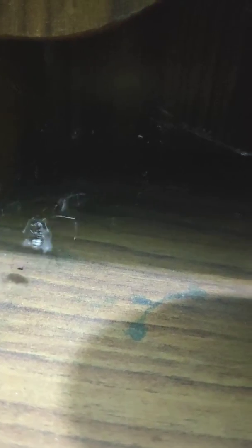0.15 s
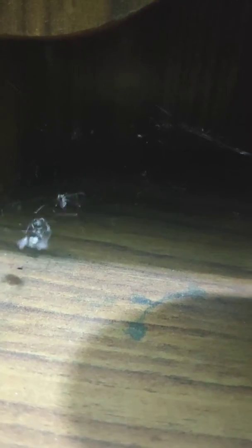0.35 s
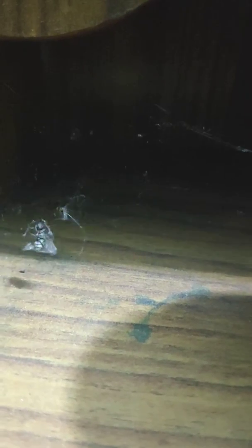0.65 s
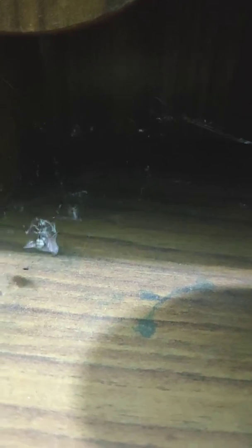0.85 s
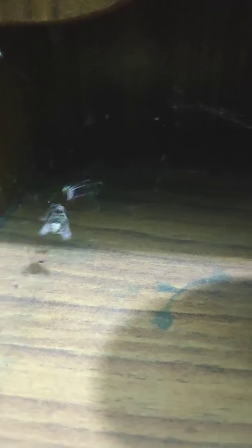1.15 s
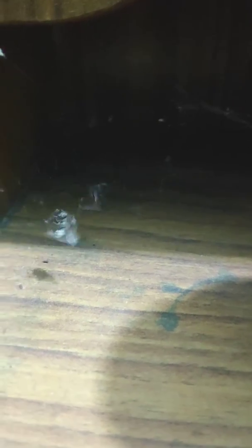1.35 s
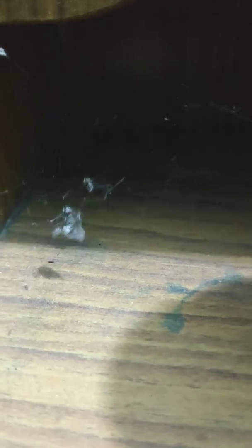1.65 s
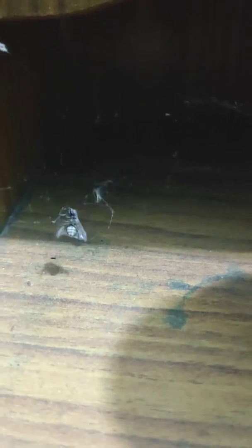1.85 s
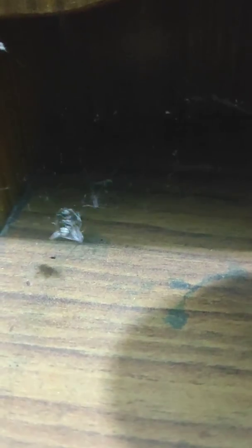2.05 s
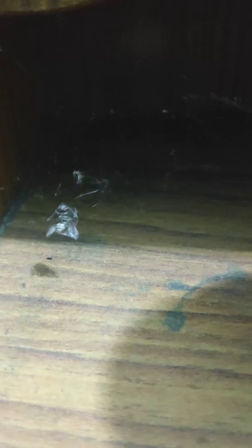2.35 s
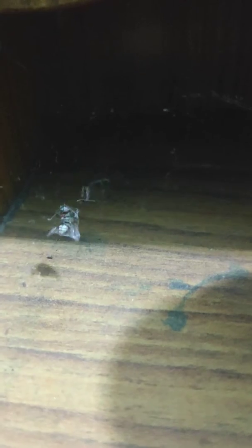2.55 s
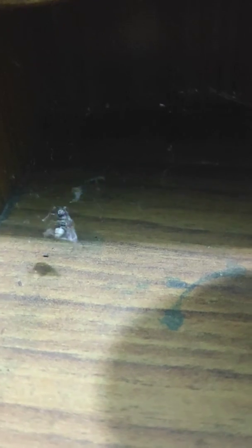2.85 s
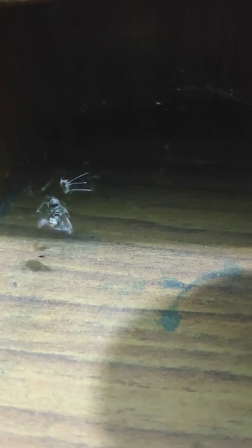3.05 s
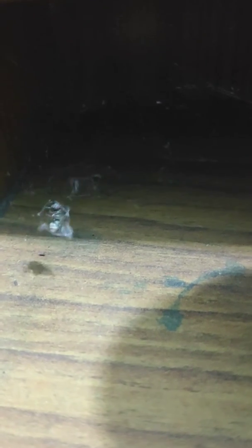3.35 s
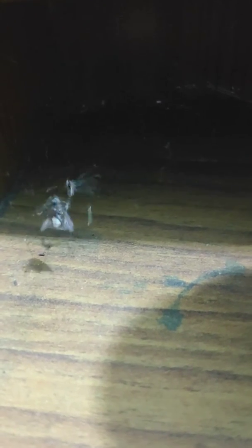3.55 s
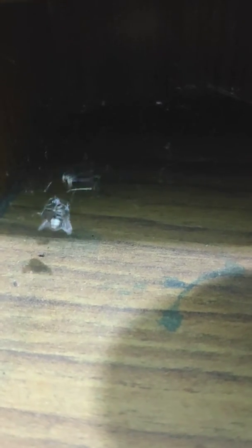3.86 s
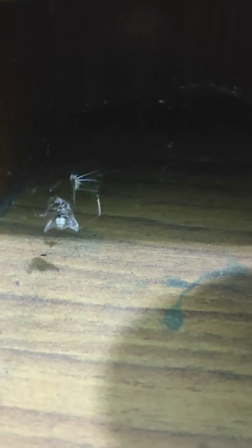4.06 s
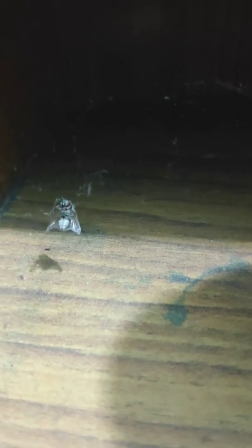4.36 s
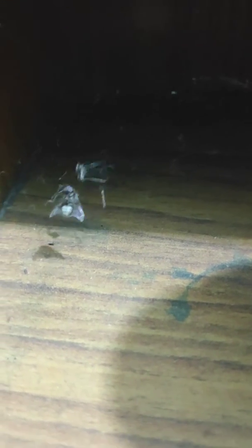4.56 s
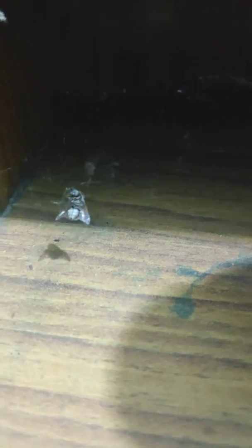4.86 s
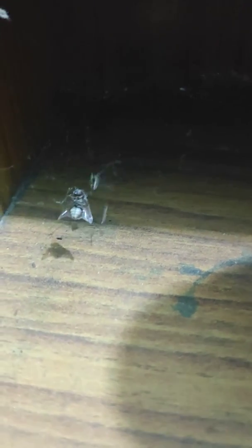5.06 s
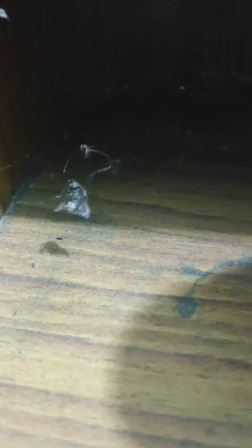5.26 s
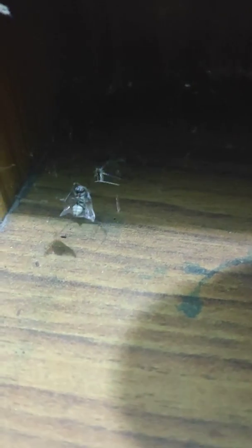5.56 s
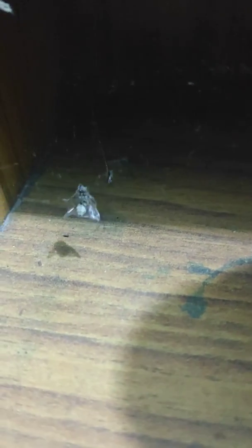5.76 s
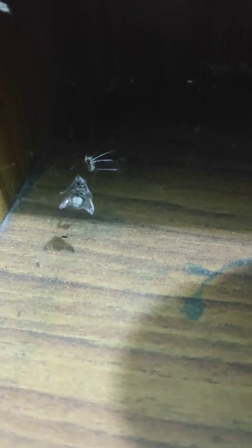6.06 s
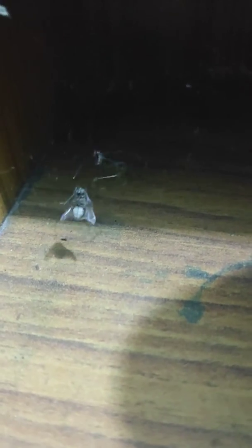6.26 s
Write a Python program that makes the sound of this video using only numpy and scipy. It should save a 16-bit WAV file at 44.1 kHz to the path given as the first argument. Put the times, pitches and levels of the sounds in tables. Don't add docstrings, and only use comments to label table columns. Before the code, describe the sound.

A trapped fly buzzes in raspy, rattling bursts on the right while heavy hand-on-microphone thumps and muffled rumbles bump on the left, cricket behind.

```python
import sys
import numpy as np
from scipy import signal
from scipy.io import wavfile
from scipy.ndimage import uniform_filter1d

SR = 44100
rng = np.random.default_rng(int(sys.argv[2]) if len(sys.argv) > 2 else 0)


def makeup_ratio(level_db):
    decades = np.asarray(level_db, float) / 20
    return 10 ** decades


def persist_wave(psi):
    counts = np.round(np.clip(psi, -1, 1) * 32767).astype(np.int16)
    wavfile.write(sys.argv[1], SR, np.atleast_2d(counts).T)


N = 282933
T = np.arange(N) / SR

# (frequency [Hz], density [dB per Hz])
ROOM = [(25, -83.5), (35, -70.5), (50, -95), (70, -90), (100, -96), (140, -105.5), (200, -99), (400, -101),
        (600, -106), (1000, -111), (1500, -113), (5000, -115), (8000, -115.5), (14000, -119)]
# (frequency [Hz], density [dB per Hz])
MUFFLED = [(25, -62), (70, -100), (140, -95.5), (300, -96.5), (600, -107), (1000, -110.5), (2500, -115),
           (5000, -117), (14000, -117.5)]
# (frequency [Hz], level [dB])
HUM = [
    (50, -65.5),
    (100, -66),
    (390, -85.5),
]
DRONE_S, DRONE_DB = 5.95, 8
# (time [s], level [dB])
WHINE = [(0, -86), (.2, -72.5), (.3, -110), (4.75, -110), (4.9, -78), (5.3, -76), (5.7, -83.5),
         (5.95, -105), (6.42, -110)]
# (frequency [Hz], width [Hz], level [dB])
WHINE_LINES = [(545, 10, 4), (1050, 41, -4), (1710, 8.1, -13), (1250, 30, -12), (249, 81, -5.5),
               (460, 28, -6)]
CHIRP_START, CHIRP_GAP = .08, .197

# (time [s], slow kneading level [dB])
GRIP = [(0, -53), (.21, -38.5), (.29, -48.5), (1.0, -50), (1.38, -42), (1.52, -53.5), (1.69, -45.5),
        (2.05, -48.5), (2.22, -38), (2.6, -43), (3.14, -53), (4.07, -57), (4.2, -40), (5.05, -42.5),
        (5.3, -43), (5.78, -48.5), (5.92, -60), (6.39, -59)]
# (time [s], quick creep level [dB])
SCUFFS = [(0.049, -36), (.6, -82), (.81, -55), (2.22, -64), (2.42, -62), (3.14, -53.5), (3.44, -50),
          (4.2, -55), (4.43, -46), (5.3, -61), (5.4, -53.5), (5.858, -53.5)]
CREEP_DB, SCUFF_S, SCUFF_KNEAD_DB = -30.5, 0.038, 5.5
# (time [s], pressure [dB], half rise [ms])
PRESSES = [(0.022, -12.5, 5.9), (0.1565, -20.5, 3.7), (0.785, -19, 0.73), (0.7904, -23.5, 1.57),
           (.055, -17, 3.4), (1.3146, -29.5, 1.64), (1.673, -20, 5.9), (1.8714, -25.5, 4.2),
           (2.3664, -27, 5.2), (2.3983, -26.5, 1.5), (2.411, -23, 3.45), (3.388, -19.5, 1.89),
           (3.401, -20.5, 3.96), (3.4224, -16, 1.77), (3.4697, -18.5, 2.3), (4.001, -32.5, 2),
           (4.1788, -15.5, 1.63), (4.261, -10, 1.8), (4.2975, -12, 1.54), (4.3158, -18, 2),
           (4.3757, -17, 3), (4.395, -13.5, 1.9), (4.4115, -20, 1.9), (4.4425, -16, 1.17),
           (4.502, -20, 2.5), (5.261, -38, 1.5), (5.352, -21.5, 4.2), (5.6116, -26.5, 1.27),
           (5.732, -28.5, 2.4), (5.8436, -5.5, 1.06), (5.854, -20, 1.8), (5.866, -33, 2),
           (5.8364, -26, 1.3), (5.432, -28, 2.3), (3.948, -32, 3.7), (3.695, -35, 3.06), (3.72, -44, 2.94),
           (2.327, -31.5, 2.6), (2.2, -35, 1.8), (2.219, -32, 1.46), (5.052, -27, 2.7), (5.205, -31.5, 3.3),
           (5.248, -38, 3.1), (5.291, -30, 2.2), (5.365, -22, 3.9), (5.409, -19, 3.1), (5.443, -18.5, 3.5),
           (6.0255, -29.5, 1.63)]
# (time [s], pressure [dB], half rise [ms])
LIFTS = [(0.0341, 0.5, 1.1), (0.052, -18, 2.8), (0.064, -24.5, 0.9), (5.341, -30, 2.5),
         (0.0733, -14.5, 1.9), (0.088, -13, 1.5), (0.1701, -16.5, 2.33), (0.2017, -17, 4.6),
         (0.7028, -26.5, 1.8), (0.8188, -17.5, 3), (1.3483, -17, 6), (2.1979, -40, 1.94),
         (2.2561, -26.5, 2.3), (2.322, -16.5, 6.6), (2.452, -30, 2.71), (3.0678, -27.5, 2.25),
         (3.134, -30.5, 2.84), (3.45, -17.5, 5.2), (3.786, -33, 1.46), (4.4259, -14, 2.64),
         (4.5453, -22, 2.74), (5.056, -27.5, 5.1), (3.731, -36.5, 2), (5.861, -30, 1.56), (5.818, -31, 2.8),
         (3.941, -37, 1.44)]
# (time [s], pressure [dB], width [ms])
SLIPS_ON = [(0.9194, -53, 0.95), (1.3437, -38, 0.67), (3.0646, -42.5, 0.77), (3.386, -34.5, 0.86),
            (3.4227, -35, 0.36), (4.194, -40.5, 0.68), (4.231, -33, 0.79), (4.3132, -30, 0.72),
            (4.41, -41, 0.68), (4.4324, -32.5, 0.68), (4.4419, -27.5, 0.88), (4.499, -39, 0.59),
            (4.65, -19.5, 0.9), (5.418, -11, 0.74), (5.608, -41, 0.7), (5.614, -43.5, 0.64),
            (5.7302, -40, 0.84), (5.81, -44, 0.63), (5.274, -55, 0.77), (5.909, -52, 0.67),
            (3.926, -48, 0.61), (6.0243, -33.5, 0.69)]
# (time [s], pressure [dB], width [ms])
SLIPS_OFF = [(0.0152, -14.5, 0.66), (.033, -9, 0.89), (0.0522, -28, 0.66), (0.0752, -27.5, 0.51),
             (0.169, -34.5, 0.99), (.212, -36.5, 0.64), (0.7836, -26, 0.49), (2.218, -72, 0.74),
             (2.396, -44, 0.62), (3.467, -36, 0.88), (3.9353, -39, 0.76), (4.2399, -18, 0.39),
             (4.2632, -28.5, 0.77), (4.2993, -30, 0.79), (4.3724, -35, 0.68), (4.397, -34, 0.78),
             (4.5411, -43, 0.65), (4.7974, -30.5, 0.82), (5.473, -32, 0.93), (5.845, -18.5, 0.96),
             (2.497, -53, 0.82), (5.879, -49, 0.52), (4.157, -50, 0.45), (0.7812, -38, 0.68),
             (0.738, -55, 0.45), (3.703, -59, 0.59)]
# (time [s], pressure [dB], half rise [ms], rebound [dB])
THUMPS = [
    (4.241, -2, 1.8, -11.5),
    (4.65, -5.5, 2, -7.5),
    (4.7952, -12.5, 2.47, -3),
    (5.4187, -9.5, 1.22, -13),
]
REBOUND_S, REBOUND_MS = 0.00957, 2.8
# (time [s], level [dB], frequency [Hz])
KNOCKS = [(.0158, -34, 750), (.034, -40, 790), (.0343, -37.5, 2050), (.0745, -49, 900), (.7838, -40, 740),
          (0.8195, -50, 970), (.088, -52, 900), (.053, -55, 1300), (.005, -43, 800), (1.312, -64, 801),
          (3.386, -49, 794), (3.421, -60, 902), (4.156, -63, 845), (4.178, -42.5, 1050), (4.238, -38, 700),
          (4.261, -53, 900), (4.313, -51, 900), (4.443, -69, 935), (4.649, -48, 960), (5.4184, -39.5, 800),
          (5.474, -60, 835), (4.541, -60, 695), (5.613, -56, 875), (5.8442, -24, 1087), (6.024, -47.5, 840),
          (2.219, -59, 993), (2.497, -68, 702), (5.413, -56, 880), (5.73, -61, 696)]
CRACK_RATIO, CRACK_DB = 1.64, -16.5
# (time [s], level [dB], clicks in a row [count])
TICKS = [
    (0.0343, -31, 7),
    (0.105, -46.5, 1),
    (0.152, -44, 1),
    (4.242, -44.5, 6),
    (5.844, -40, 1),
]

# (time [s], wing rate [beats per s], wing slap level [dB])
LUNGE = [(0.165, 250, -64), (0.2, 260, -64), (0.255, 230, -55.5), (0.29, 223, -54.5), (0.34, 172, -52),
         (0.355, 190.3, -56.5), (0.37, 207, -56.5), (0.405, 186, -57)]
JERK = [(0.425, 192.3, -63), (0.45, 189.7, -56), (0.485, 187.5, -58.5), (0.53, 157, -51),
        (0.545, 152.6, -49), (0.58, 163.9, -60), (0.63, 173.8, -61.5), (0.665, 195.7, -57.5)]
COAST = [(0.685, 194.7, -56.5), (0.715, 190.7, -62), (0.735, 198.3, -61.5), (0.795, 203, -65),
         (0.86, 193, -66.1), (0.925, 220.4, -67), (1.026, 225.9, -67), (1.061, 220.8, -66),
         (1.17, 235.7, -67)]
HAUL = [(1.215, 232.9, -64.5), (1.271, 214.5, -59.5), (1.305, 200.3, -64.5), (1.375, 180, -57),
        (1.404, 176.6, -58), (1.43, 158.7, -63), (1.449, 159.5, -58.5), (1.485, 147.2, -58)]
TUG = [(1.505, 154.2, -57.5), (1.525, 174.2, -61.5), (1.61, 198.9, -58), (1.64, 193.4, -55.5),
       (1.66, 181.2, -57.5), (1.685, 183.4, -56.5), (1.73, 165.8, -58.5), (1.744, 166, -56.5)]
WRENCH = [(1.765, 168.9, -57), (1.825, 174.1, -60.5), (1.85, 189.4, -58.5), (1.89, 184, -61),
          (1.945, 194.5, -59), (2.015, 176, -57), (2.06, 147.7, -60.5), (2.075, 152.2, -62)]
REST = [(2.098, 170.5, -67.5), (2.115, 174.1, -64), (2.145, 183.5, -67.5), (2.18, 195.1, -66),
        (2.215, 203.4, -63.5), (2.24, 195.1, -62.5), (2.34, 224.2, -68), (2.415, 222.5, -60.5)]
HANG = [(2.435, 219.7, -61), (2.505, 223.4, -68.5), (2.55, 212.8, -65), (2.665, 216, -68.5),
        (2.755, 192.1, -64.5), (2.775, 202.9, -65), (2.81, 196, -69), (2.82, 187.9, -65.5)]
THRASH = [(2.845, 191.5, -58.5), (2.865, 189.5, -60), (2.89, 167.6, -59), (2.925, 151.6, -57.5),
          (2.95, 156.7, -57.5), (2.984, 175.1, -58.5), (3.015, 178.4, -54), (3.065, 159.6, -56)]
GRIND = [(3.085, 165, -55), (3.1, 164.9, -54), (3.12, 169.4, -58), (3.17, 171.1, -56), (3.2, 157.6, -57.5),
         (3.24, 158.2, -59.5), (3.265, 150.5, -61), (3.295, 149.1, -61)]
KICK = [(3.315, 150.9, -57), (3.34, 152.1, -59), (3.375, 170.2, -60.5), (3.41, 176.3, -60.5),
        (3.44, 162, -60.5), (3.475, 156.8, -55.5), (3.495, 164.6, -62), (3.515, 189.4, -58)]
TIRE = [(3.535, 193.7, -57.5), (3.625, 183, -59.5), (3.7, 185.8, -64), (3.83, 212.7, -64.5),
        (3.86, 204.7, -63.5), (3.9, 209, -68.5), (3.92, 219.4, -77), (3.975, 212, -76)]
BOUTS = [LUNGE, JERK, COAST, HAUL, TUG, WRENCH, REST, HANG, THRASH, GRIND, KICK, TIRE]
# (high rattle [dB], wing tone [dB], body twist [dB per half octave], scrape [0-1])
POSTURE = [(-63, -65, -1.5, 1), (-63, -64.5, 4.5, 0.74), (-65.5, -64.5, 1.5, 1), (-66, -67, -4, 0),
           (-66, -64.5, 3, .3), (-66, -64, 0, 0.44), (-63.5, -66, 0, 0.99), (-69, -67.5, 3, 0.26),
           (-64.5, -66, 1, 0.01), (-66.5, -65.5, -3.5, 0), (-62, -63, -1, 0), (-68.5, -66, -4.5, 0.29)]
EASY_DB, RATTLE_FOLLOWS, TONE_FOLLOWS, SHIFT_S = -52.5, 0.33, 0.43, 0.21
# (third [dB], fifth [dB], sixth [dB], seventh [dB], buzz [dB])
STROKE = [(9, -1.5, 6, 3.5, -14), (0.5, -9, 0, 1.5, -9.5), (6, -4, 0.5, -3.5, -14), (-4, -8, 1, 2.5, -19.5),
          (-5, -2, 3, -1.5, -9.5), (-4.5, -5, 5, 2, -10.5), (3, 0, -4.5, -2, -31), (5, -3, -1, -5, -21),
          (-17, -4, -1, 2, -10), (-4, -11, 4, 0, -13.5), (-7, -4, 2, 1, -10.5), (5.5, -3.5, 2.5, -2.5, -18)]
SECOND_DB, UPPER_FALL_DB = -9.5, -3.5
# (time [s], length [s])
STUMBLES = [
    (2.088, 0.0093),
    (2.802, .016),
    (2.838, 0.0024),
    (2.852, 0.0085),
]
# (frequency [Hz], width [Hz], level [dB])
SLAP = [(6600, 700, -4), (7350, 700, 0), (8200, 850, 0), (9150, 900, -2.5), (10200, 1000, -11),
        (11300, 1300, -9), (14800, 4000, -21)]
# (frequency [Hz], width [Hz], level [dB])
RATTLE = [
    (2500, 520, -4.5),
    (3200, 600, -2),
    (4050, 800, -16),
    (5100, 440, 0),
    (5850, 800, -7),
]
# (time [s], level [dB], half length [s])
TOUCHES = [(0.48, -65, 0.21), (0.825, -70, 0.097), (1.342, -74, 0.21), (1.723, -71.5, 0.17),
           (2.029, -66, 0.061), (2.245, -68.5, 0.093), (2.426, -76.5, 0.076), (3.088, -73, 0.25),
           (3.719, -76, 0.18), (2.15, -83, 0.038), (2.351, -80, .06)]
LOOSE_DB = -79


def evened(x):
    return x / np.sqrt(np.mean(x ** 2) + 1e-20)


def read(points, hz):
    f, value = np.transpose(points)
    return np.interp(np.log(hz + 1), np.log(f + 1), value)


def curves(rows):
    s, *columns = np.transpose(rows)
    return [np.interp(T, s, c) for c in columns]


def drift(per_s):
    return np.interp(T * per_s, np.arange(3000), rng.standard_normal(3000)) * 1.2


def resonate(x, hz, width, order=1):
    turn = np.exp(2j * np.pi * np.cumsum(hz * np.ones(N)) / SR)
    r = np.exp(-np.pi * width / SR)
    low = x / turn
    for _ in range(order):
        low = signal.lfilter([1 - r], [1, -r], low)
    return 2 * (turn * low).real


def hiss(points, patchy_db):
    frames, hz = N // 512 + 5, np.fft.rfftfreq(2048, 1 / SR)
    a, b, patch = rng.standard_normal((frames, 1025, 3)).T
    patch = uniform_filter1d(patch, size=8, axis=0)
    patch = evened(uniform_filter1d(patch, size=4, axis=1))
    white = evened(signal.istft(a + 1j * b, nperseg=2048, noverlap=1536)[1])
    z = signal.stft(white, nperseg=2048, noverlap=1536)[2]
    z = z * makeup_ratio(read(points, hz)[:, None] + patchy_db * patch)
    return np.sqrt(SR / 2) * signal.istft(z, nperseg=2048, noverlap=1536)[1][:N]


def room_hum():
    out = 0
    for hz, db in HUM:
        swell_db = DRONE_DB * (hz > 300) * np.clip((T - DRONE_S) / 0.092, 0, 1)
        level = makeup_ratio(db + 3.3 * drift(6.5) + swell_db)
        out = out + level * np.sin(2 * np.pi * (hz * T + 0.55 * drift(8.6)))
    return out


def far_whine():
    out = 0
    for hz, width, db in WHINE_LINES:
        out = out + makeup_ratio(db) * evened(resonate(rng.standard_normal(N), hz, width))
    return makeup_ratio(curves(WHINE)[0]) * out


def cricket():
    phase = (T - CHIRP_START) / CHIRP_GAP % 1
    gate = np.clip(phase / .14, 0, 1) * np.clip((.66 - phase) / .42, 0, 1) * makeup_ratio(drift(42.))
    return makeup_ratio(-76.5) * gate * evened(resonate(rng.standard_normal(N), 5720, 420, order=2))


def add(mix, s, sound):
    part = mix[max(round(s * SR), 0):][:len(sound)]
    part += sound[:len(part)]


def push(ms):
    u = np.arange(3000) / (SR * ms / 1000)
    return (u / 2) ** 2 * np.exp(2 - u) * (1 - np.exp(-(u / .6) ** 2))


def flick(ms):
    u = np.arange(600) / (SR * ms / 1000) - 3
    return -u * np.exp((1 - u ** 2) / 2) * (1 - np.exp(-(2 * u + 6) ** 2))


def vented(x):
    turn = 2 * np.pi * 44.9
    return signal.lfilter(*signal.bilinear([1, 0, 0], [1, turn / 0.79, turn ** 2], SR), x)


def creep(per_s, sizes_ms):
    out = 0
    for ms in sizes_ms:
        train = rng.standard_normal(N) * (rng.random(N) < per_s / SR)
        soft = uniform_filter1d(np.roll(push(ms), 200), size=max(round(ms * SR / 1000), 1))
        out = out + signal.oaconvolve(train, soft)[:N] / np.sqrt(ms)
    return evened(vented(out))


def kneading():
    scuff = np.zeros(N)
    for s, db in SCUFFS:
        scuff = scuff + makeup_ratio(db) * np.exp(-((T - s) / SCUFF_S) ** 2)
    knead = makeup_ratio(curves(GRIP)[0])
    slow = (knead + makeup_ratio(SCUFF_KNEAD_DB) * scuff) * creep(180., (2.1, 3.2, 5.))
    quick = (makeup_ratio(CREEP_DB) * knead + scuff) * creep(250., (.6, 1.1))
    return slow + quick


def knock(hz):
    cycles = np.arange(400) * hz / SR
    envelope = (cycles / 0.34) * np.exp(1 - cycles / 0.5) * (1 - np.exp(-(cycles / 0.35) ** 2))
    return np.sin(2 * np.pi * cycles) * envelope


def port_pressure():
    air = np.zeros(N)
    gestures = ((push, 1, PRESSES), (push, -1, LIFTS), (flick, 1, SLIPS_ON), (flick, -1, SLIPS_OFF))
    for shape, direction, rows in gestures:
        for s, db, ms in rows:
            add(air, s, direction * makeup_ratio(db) * shape(ms))
    for s, db, ms, rebound_db in THUMPS:
        add(air, s, makeup_ratio(db) * push(ms))
        add(air, s + REBOUND_S, makeup_ratio(db + rebound_db) * push(REBOUND_MS))
    for s, db, hz in KNOCKS:
        crack = makeup_ratio(CRACK_DB + 0.43 * (db + 31)) * knock(CRACK_RATIO * hz)
        add(air, s, makeup_ratio(db + 0.5) * (knock(hz) + crack))
    air = signal.lfilter(*signal.butter(2, 2500., fs=SR), air)
    return vented(air)


def fast_ticks():
    ticks = np.zeros(N)
    for s, db, repeats in TICKS:
        for k in range(max(round(repeats), 1)):
            add(ticks, s + k / 6050., makeup_ratio(db) * np.array([.5, 1, .5]))
    return signal.sosfilt(signal.butter(2, 800., "high", fs=SR, output="sos"), ticks)


def by_bout(table):
    bout = np.maximum(np.searchsorted([rows[0][0] for rows in BOUTS], T) - 1, 0)
    return uniform_filter1d(np.array(table, float)[bout].T, size=round(SHIFT_S * SR), axis=1)


def effort():
    hz, slap_db = curves(sum(BOUTS, []))
    rattle_db, tone_db, twist_db, rough = by_bout(POSTURE)
    over_db = slap_db - EASY_DB
    dying_db = np.minimum(over_db + 12, 0)
    rattle_db = rattle_db + RATTLE_FOLLOWS * over_db + dying_db - slap_db
    tone_db = tone_db + TONE_FOLLOWS * over_db + dying_db / 2 - slap_db
    return hz, slap_db, rattle_db, tone_db, twist_db, rough


def body(x, modes, wander_db, tilt_db):
    out = 0
    for k, (hz, width, db) in enumerate(modes):
        lean_db = tilt_db * np.clip(4 * np.log2(hz / 8200.), -.6, .8) * (hz > 7000)
        ring = resonate(x, hz * (1 + .012 * drift(9.)), width, order=2)
        out = out + (-1) ** k * makeup_ratio(db + lean_db + wander_db * drift(12.)) * ring
    return out / np.sqrt(uniform_filter1d(out ** 2, size=3000) + 1e-12)


def wing_slap(clicks, puff, noise, rough, twist_db):
    drive = clicks + noise * (.14 * puff + .04 * np.clip(rough, 0, 1))
    drive = drive + .3 * np.roll(drive, round(.0011 * SR))
    return body(drive, SLAP, wander_db=2.6, tilt_db=twist_db / 2)


def high_rattle(knocks):
    rattle = body(knocks, RATTLE[3:], wander_db=2, tilt_db=0) * makeup_ratio(1.8 * drift(9.) + 1.5 * drift(30.))
    buzz_db = by_bout(STROKE)[4]
    return rattle - makeup_ratio(buzz_db + 1.5) * evened(resonate(knocks, 4050., 1300., order=2))


def low_rattle(knocks):
    coupling = makeup_ratio(LOOSE_DB)
    for s, db, half in TOUCHES:
        coupling = coupling + makeup_ratio(db) * np.exp(-((T - s) / half) ** 2)
    release = np.clip((TIRE[-2][0] - T) / .03, 0, 1)
    return body(knocks, RATTLE[:3], wander_db=2.2, tilt_db=0) * coupling * release


def wing_tone(turns, stroke_level, strain, noise):
    third_db, fifth_db, sixth_db, seventh_db, _ = by_bout(STROKE)
    partials_db = [SECOND_DB, third_db, 0, fifth_db, sixth_db]
    partials_db += [seventh_db + UPPER_FALL_DB * k for k in range(6)]
    tone = 0
    for partial, db in enumerate(partials_db, start=2):
        tone = tone + makeup_ratio(db + 2 * drift(11.)) * np.cos(2 * np.pi * (partial * turns + rng.random()))
    tone = evened(tone) * uniform_filter1d(stroke_level, size=60)
    tone = tone + .22 * strain * evened(resonate(noise, 1250., 500.))
    return tone / np.sqrt(uniform_filter1d(tone ** 2, size=4000))


def wings_free():
    alive = np.clip((T - LUNGE[0][0]) / 0.044, 0, 1) * np.clip((TIRE[-1][0] - T) / 0.017, 0, 1)
    for s, length in STUMBLES:
        outside = abs(T - s - length / 2) - length / 2
        alive = alive * np.clip(0.078 + outside / 0.0014, .08, 1)
    return alive


def fly():
    hz, slap_db, rattle_db, tone_db, twist_db, rough = effort()
    strain = np.clip((215 - hz) / 50, 0, 1)
    turns = np.cumsum(hz * (1 + (.003 + .013 * strain) * drift(70.))) / SR
    strength = makeup_ratio(1.6 * rng.standard_normal((2000, 2)))
    down = np.floor(turns).astype(int)
    up = np.floor(turns + 0.66 + 0.023 * drift(170.)).astype(int)
    downstrokes = np.diff(down, prepend=0) * strength[down, 0]
    upstrokes = np.diff(up, prepend=0) * strength[up, 1]
    clicks = downstrokes + (0.56 + .5 * np.clip(rough, 0, 1)) * upstrokes
    puff = np.exp(-(turns % 1) / hz / 0.00024) * strength[down, 0]
    noise = rng.standard_normal(N)
    knocks = downstrokes + .4 * clicks + (.026 + .028 * strain) * noise
    sound = wing_slap(clicks, puff, noise, rough, twist_db)
    sound = sound + makeup_ratio(rattle_db) * high_rattle(knocks)
    sound = sound + makeup_ratio(tone_db) * wing_tone(turns, strength[down, 1], strain, noise)
    return wings_free() * (makeup_ratio(slap_db + 0.58 * drift(45.)) * sound - low_rattle(knocks))


def scene():
    right = hiss(ROOM, patchy_db=.7) + room_hum() + far_whine() + cricket() + fly()
    left = hiss(MUFFLED, patchy_db=.7) + kneading() + port_pressure() + fast_ticks()
    return np.array([left, right])


def low_pass(x):
    return signal.sosfilt(signal.butter(12, 15850, fs=SR, output="sos"), x)


def record(dry):
    lowpass = signal.firwin(511, 15850, window=("kaiser", 9), fs=SR)
    mix = signal.oaconvolve(dry, lowpass[None], "same")
    return low_pass(mix)


dry = scene()
out = record(dry)
persist_wave(out)
```